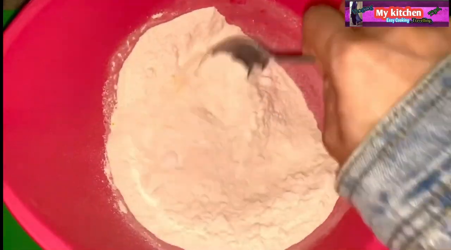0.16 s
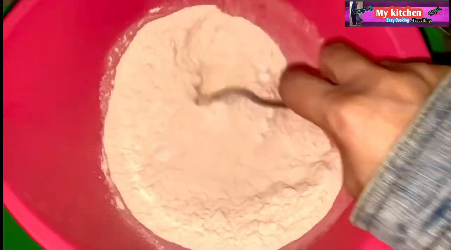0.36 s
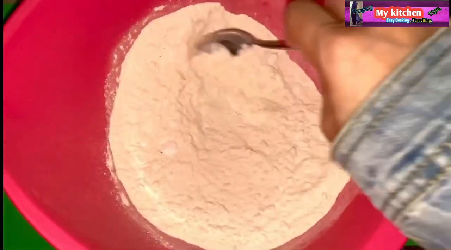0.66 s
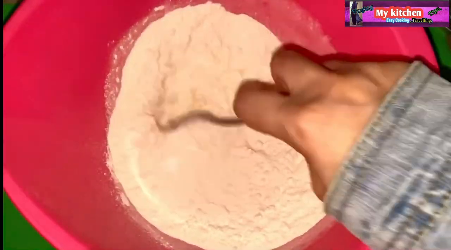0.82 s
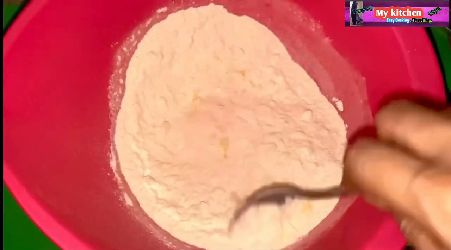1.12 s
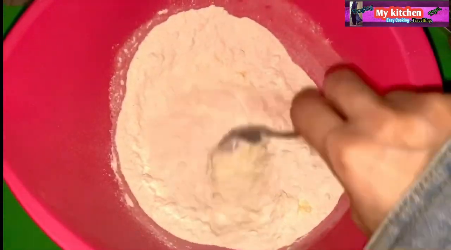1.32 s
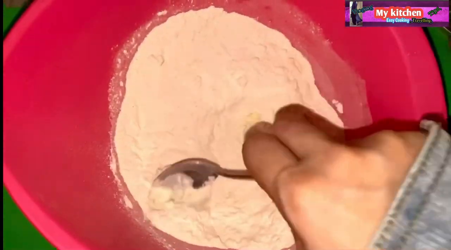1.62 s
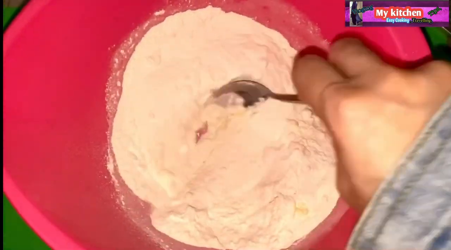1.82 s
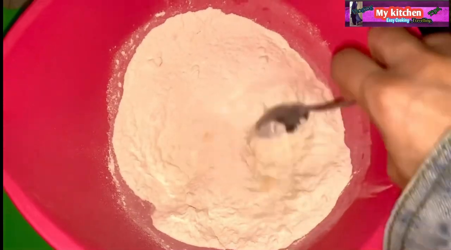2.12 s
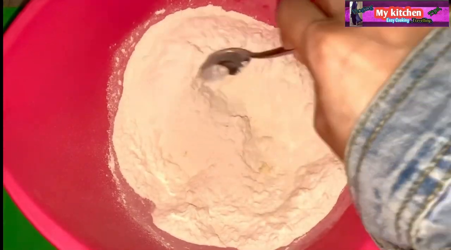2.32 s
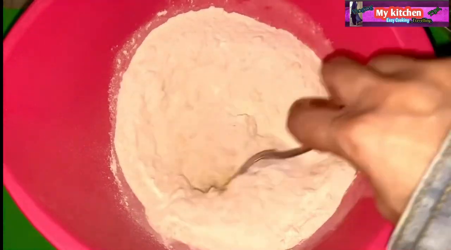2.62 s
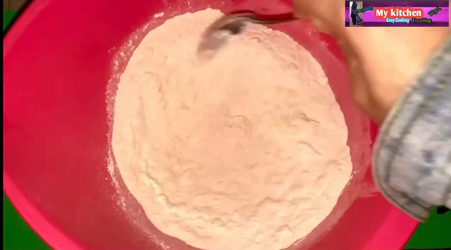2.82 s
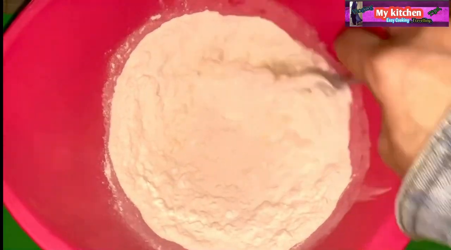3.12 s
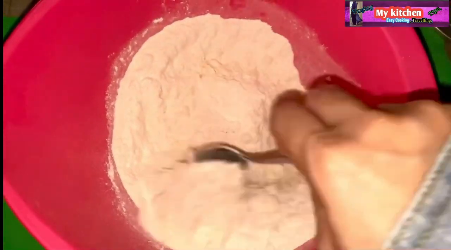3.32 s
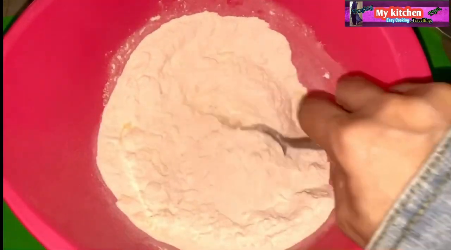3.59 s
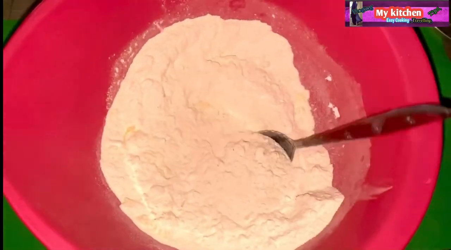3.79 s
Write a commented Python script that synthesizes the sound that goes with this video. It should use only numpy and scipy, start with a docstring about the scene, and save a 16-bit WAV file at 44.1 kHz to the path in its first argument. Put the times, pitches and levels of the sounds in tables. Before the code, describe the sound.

A metal spoon stirs dry flour in a plastic bowl with gritty scrapes and dull knocks

```python
"""A metal spoon stirs dry flour in a plastic bowl, close under a phone in a small kitchen.
From the start a low room rumble, airy room noise and a wavering mains hum run under soft hisses of sliding flour.
Knocks begin at 0.14 s: a blow and one quick bounce ring the parts of the bowl and add a crack of noise.
Scrapes come in bursts from 0.29 s to the end: flour grains grind under the spoon's edge, ring the bowl and hiss.
A short, dull echo follows the sounds of the bowl."""
import sys
import numpy as np
from scipy import signal
from scipy.fft import rfft, irfft
from scipy.io import wavfile
from scipy.ndimage import uniform_filter1d

SR = 44100
rng = np.random.default_rng(int(sys.argv[2]) if len(sys.argv) > 2 else 0)


def log_audio(samples):
    """Write samples as a 16-bit WAV file to the path given in sys.argv[1]."""
    # one column per channel
    frames = np.atleast_2d(samples).T
    # limit to full scale, then quantise
    limited = np.clip(frames, -1, 1)
    pcm = np.round(limited * 32767).astype(np.int16)
    wavfile.write(sys.argv[1], SR, pcm)


N = 174195  # length of the scene [samples]


def undb(db):
    """Turn decibels into a plain amplitude factor."""
    return 10 ** (np.asarray(db) / 20)


def unit(x):
    """Scale a sound to an rms of 1."""
    return x / np.sqrt(np.mean(x ** 2))


def over_hz(table, outside=None):
    """Read a (frequency [Hz], value) table at every frequency bin, along a log scale of pitch."""
    hz, value = np.array(table).T
    bins_hz = np.fft.rfftfreq(N, 1 / SR)
    return np.interp(np.log(bins_hz + 1), np.log(hz + 1), value, outside, outside)


def colour(x, table):
    """Filter a sound by a (frequency [Hz], level [dB]) table, silent outside it."""
    return irfft(rfft(x) * undb(over_hz(table, outside=-200)), N)


def walk(rate):
    """Wander through random levels, `rate` new ones a second, smoothed twice; spread near 1."""
    hold = int(SR / rate)
    steps = np.repeat(rng.standard_normal(N // hold + 1), hold)
    smooth = uniform_filter1d(uniform_filter1d(steps, hold), hold)
    return 1.5 * smooth[:N]


RISE_CYCLES = 0.47  # a mode swells over about this many of its own cycles


def ring(x, modes):
    """Let a force set off decaying tones (modes) of a solid part; white noise keeps its rms."""
    t = np.arange(SR // 2) / SR
    response = np.zeros(len(t))
    for k, (hz, db, t60) in enumerate(modes):
        swell = 1 - np.exp(-(t * hz / RISE_CYCLES) ** 2)
        decay = 1000. ** (-t / t60)  # 60 dB down after t60 seconds
        response += (-1) ** k * undb(db) * np.sin(2 * np.pi * hz * t) * decay * swell
    return signal.fftconvolve(x, response / np.sqrt(np.sum(response ** 2)))[:N]


# grains per second, and how strongly their random size spreads their level [dB]
GRAINS_PER_S, GRAIN_SPREAD_DB = 6000, 1.8
# how often a new strength of catch-and-slip is drawn, and how far it swings the level [dB]
CATCH_PER_S, CATCH_DB = 110, 2.3


def grains():
    """Make dense clicks, one per flour grain of uneven size; the edge catches and slips."""
    hit = rng.random(N) < GRAINS_PER_S / SR
    size = rng.exponential(size=N)
    sign = np.sign(rng.standard_normal(N))
    return unit(hit * sign * undb(GRAIN_SPREAD_DB * size + CATCH_DB * walk(CATCH_PER_S)))


# colour of the low room rumble: (frequency [Hz], relative level [dB per Hz])
RUMBLE = [(15, -50), (25, -35), (49, -9), (75, -8), (145, -5.5), (178, -7), (345, -15.5), (367, -18),
          (484, -15.5), (746, -23.5), (1000, -32), (1300, -34), (2200, -120)]
# colour of the airy room noise: (frequency [Hz], relative level [dB per Hz])
AIR_NOISE = [(530, -26), (900, -17), (1070, -12), (1160, 3), (1730, 5), (2270, -3), (6120, -9.5),
             (8600, -34.5), (11200, -52), (18900, -120)]
# balance of the room noise between the phone's two mic ports: (frequency [Hz], left minus right [dB])
ROOM_BALANCE = [(60, 3.5), (110, 1), (200, 3), (380, 2), (700, -2.5), (1290, -1), (2380, -8.5),
                (4400, -4.5), (8120, -26.5), (15000, 30)]
RUMBLE_DB, AIR_DB = -44.5, -60  # rms level of the two sides averaged [dB]
ALIKE_BELOW_HZ = 375  # the two sides grow alike below this
ROOM_FLICKER_DB = 1.


def room(spectrum, level_db):
    """Noise in gently flickering octaves; its two sides share more of it towards the bass."""
    hz = np.fft.rfftfreq(N, 1 / SR)
    apart = np.clip(hz / ALIKE_BELOW_HZ, .1, 1) ** 1.17
    shape = undb(over_hz(spectrum, outside=-200))
    mid, side = (rfft(rng.standard_normal(N)) * shape for _ in range(2))
    left_right = mid + apart * side * np.array([[1], [-1]])
    left_right = left_right * undb(np.outer([.5, -.5], over_hz(ROOM_BALANCE)))
    out = 0
    for low_hz in 20 * 2 ** np.arange(10):
        octave = irfft(left_right * ((hz >= low_hz) & (hz < 2 * low_hz)), N)
        out = out + octave * undb(ROOM_FLICKER_DB * walk(11.0))
    return out / np.sqrt(np.mean(out.mean(axis=0) ** 2)) * undb(level_db)


# tones of the humming appliance: (multiple of the mains frequency, middle level [dB])
HUM_TONES = [(1, -55), (2, -51), (3, -46.5), (4, -50), (5, -76), (6, -57)]
MAINS_HZ, HUM_WAVER_DB = 50.25, 2.5  # middle pitch; typical swing of each tone's level


def hum():
    """An appliance hums at multiples of the mains; pitch and levels waver."""
    mains_hz = MAINS_HZ * (1 + 0.0091 * walk(3.4))
    turn = 2 * np.pi * np.cumsum(mains_hz) / SR
    return sum(undb(db + HUM_WAVER_DB * walk(4.5)) * np.sin(k * turn + k) for k, db in HUM_TONES)


# colours of grinding flour, coarse to fine: (frequency [Hz], relative level [dB per Hz])
COARSE_GRIT = [(1100, -22), (1500, -9), (2150, -3.5), (2400, -7), (2600, -5), (2760, 0.5), (2950, -5),
               (3620, -9), (4500, -17), (5850, -33), (9900, -120)]
FINE_GRIT = [(2650, -45), (4500, -0.5), (5080, 2.5), (7780, 0.5), (8350, -2.5), (8600, -54), (11200, -48),
             (18900, -120)]
FLOUR_DUST = [(5060, -48), (8600, -38), (9050, -2), (10300, 3), (12200, -1), (13300, -22), (14800, -2),
              (16300, -13)]
# loose flour sliding off the spoon: (time [s], level of its dust hiss [dB])
SLIDES = [(0.0, -93), (0.15, -71.5), (0.31, -72), (0.43, -98), (0.66, -69.5), (0.78, -60), (0.9, -80),
          (1.12, -79), (1.26, -87), (1.73, -66), (1.9, -82), (2.07, -78.5), (2.3, -77), (2.5, -82),
          (2.65, -86), (2.88, -74.5), (3.04, -69.5), (3.19, -89), (3.45, -72.5), (3.54, -84), (3.68, -72),
          (3.95, -71)]
SWISH_FINE_GRIT_DB, SWISH_COARSE_GRIT_DB = 4, 8.5  # above the dust hiss


def swish():
    """Loose flour slides softly: one stream of grains makes dust hiss and two sizes of grit."""
    s, db = np.array(SLIDES).T
    force = grains()
    hiss = unit(colour(force, FLOUR_DUST))
    hiss = hiss + undb(SWISH_FINE_GRIT_DB) * unit(colour(force, FINE_GRIT))
    hiss = hiss + undb(SWISH_COARSE_GRIT_DB) * unit(colour(force, COARSE_GRIT))
    return hiss * undb(np.interp(np.arange(N) / SR, s, db))


# ringing tones of table, bowl and spoon: (frequency [Hz], relative level [dB], time to fall 60 dB [s])
TABLE_THUMP = [(58, 0, .35), (100, -12, .15)]
BOWL_BELLY = [(152, 3, 0.031), (233, 0, 0.038), (304, 1.2, 0.028)]
BOWL_FOOT = [(379, 2.5, 0.02), (429.6, -2.5, 0.043)]
BOWL_WALL = [(551, 1, 0.016), (628, 0.5, 0.024), (710, -2.5, 0.021)]
UPPER_WALL = [(948, 21.8, 0.0086), (1141, 6.3, 0.053), (1234, 14.7, 0.024), (1422, 6.2, 0.042)]
BOWL_RIM = [(1502, -1, 0.024), (1736, 2, 0.017), (1973, 10, 0.0089), (2203, 3.5, 0.0087)]
SPOON_METAL = [(3920, -6, .012), (4300, 0, .012), (5330, -8, .012), (6250, -8, .012), (7250, -5, .012)]
# colour of the noisy crack: (frequency [Hz], relative level [dB per Hz])
CRACK_COLOUR = [(1350, -20), (2300, -5), (2800, -9), (3460, -20.5), (5300, -17.5), (8530, -20.5),
                (12600, -27), (16300, -51)]
# spoon knocks: (time [s], strength before the shared gain [dB], wall pitch ratio, bounce against first blow [dB],
# then levels against the strength [dB]: table thump, belly, foot, wall, upper wall, rim, spoon, crack)
KNOCK_LIST = [(0.139, -51, 1.01, -12.5, -9, 7, -12, -15, -9, -10, -29, -27),
              (0.2487, -15, 1.01, -27, -33, -16, -44, -23, -12, -6, -55, -20),
              (.630, -18.5, .97, -20, -19, -39, -34, -14, -11.5, -32, -28, -11),
              (.767, -31, 1.05, -20, -22, -25, -23, -16, -11, -16, -30, -17),
              (0.779, -20, 1.01, -5, -29, 0.5, -20, -18, -31, -32, -36, -30),
              (1.574, -4.5, .9, -28, -12.5, -3, -42, -5.5, -28.5, -32, -61, -30),
              (3.128, -29.5, 1.01, -19, -0.5, 2, -29, -4, -18, -22, -24, -17),
              (3.392, -41, 1.01, -7, -19, -6, -28, -16, -10, -3.5, -42, -24),
              (3.719, 3, 1.12, -10, -48, -36, -18, -12.5, -10.5, -8.5, -50, -22),
              (3.756, -16, 1.01, -16, -27, -27, -22, -11, -6, -20, -35, -42),
              (3.862, -27.5, 1.01, -17, -6, -20, -15, -22, -29, -35, -10.5, -22)]
KNOCK_GAIN_DB = -7.5  # shared by all knocks
CRACK_T60_S, BOUNCE_AFTER_S = 0.013, 0.0056


def knocks():
    """Each knock, with one quick bounce, rings the bowl and cracks; flour on the wall bends its pitch."""
    out = np.zeros(N + SR)
    crack = unit(colour(rng.standard_normal(N), CRACK_COLOUR))
    fade = 1000. ** (-np.arange(2000) / SR / CRACK_T60_S)
    fade = fade / np.sqrt(np.sum(fade ** 2))
    for s, strength_db, bend, bounce_db, *parts_db, crack_db in KNOCK_LIST:
        at = int(s * SR)
        blow = np.zeros(int(BOUNCE_AFTER_S * SR) + 1)
        blow[[0, -1]] = 1, -undb(bounce_db)
        # the first blow holds as much energy as 10 ms of sound at that level
        blow = blow * undb(strength_db + KNOCK_GAIN_DB) * np.sqrt(SR / 100)
        wall = [(hz * bend, db, t60) for hz, db, t60 in BOWL_WALL]
        parts = (TABLE_THUMP, BOWL_BELLY, BOWL_FOOT, wall, UPPER_WALL, BOWL_RIM, SPOON_METAL)
        sound = sum(undb(db) * ring(blow, part) for db, part in zip(parts_db, parts))
        out[at:at + len(sound)] += sound
        puff = np.convolve(np.abs(blow), fade)
        out[at:at + len(puff)] += undb(crack_db) * puff * crack[at:at + len(puff)]
    return out[:N]


# one list per scrape of the spoon: (time [s], then levels [dB]: coarse grit, bowl belly and foot, wall,
# upper wall, rim, fine grit, dust)
SCRAPE_LIST = [
    [(0.29, -81, -64, -66, -52, -63, -73, -52), (0.305, -57, -41, -48, -50, -50, -58, -62),
     (0.311, -38, -40, -43, -41, -42, -50, -57), (0.342, -32.5, -35.5, -30.5, -29.5, -39, -35, -43.5),
     (0.364, -26.5, -48, -24.5, -31.5, -27, -38, -44), (0.378, -47, -32, -38, -41, -49, -54, -55),
     (0.392, -52, -65, -85, -71, -58, -62, -65), (0.43, -59, -66, -68, -62, -54, -65, -71)],
    [(0.69, -62, -61, -59.5, -57, -39, -56, -74), (0.696, -63, -57, -59, -58, -52, -55, -76),
     (0.702, -64, -63, -58, -47, -41.5, -57, -78), (0.712, -73, -63, -62, -60, -42, -58, -79),
     (0.725, -67, -51, -63, -55, -73, -75, -81)],
    [(0.779, -43, -50, -50, -56, -50, -47, -55), (0.79, -45, -31, -40, -53, -50, -44, -47),
     (0.804, -38.5, -46, -52, -38, -50, -43, -46), (0.826, -36.5, -27, -27, -37.5, -30.5, -34.5, -41.5),
     (0.838, -37, -26, -38, -29, -47, -39.5, -51), (0.852, -48, -69, -60, -53, -43, -53, -58),
     (0.87, -50.5, -63, -76, -62, -53, -55.5, -70)],
    [(1.13, -61, -63, -61, -68, -68, -77, -81), (1.146, -53, -61, -71, -50, -60, -60, -65),
     (1.172, -48.5, -54, -51, -55, -47, -56.5, -64), (1.196, -49.5, -43, -65, -53, -45, -60, -63),
     (1.212, -49, -61, -68, -65, -55, -60, -63), (1.226, -60, -57, -61, -59, -66, -65, -69),
     (1.24, -61, -64, -70, -58, -59, -65, -73)],
    [(1.32, -51, -58, -44.5, -52, -55, -67, -67), (1.328, -61, -39, -56, -62, -59, -72, -72),
     (1.338, -54, -63, -63, -54, -52.5, -62, -65), (1.362, -52, -42, -71, -53, -49, -62, -62),
     (1.368, -64, -63, -58, -58, -64, -66, -68), (1.388, -64, -65, -68, -62, -74, -71, -70),
     (1.4, -64, -44.5, -59, -54, -64, -68, -67)],
    [(1.575, -52, -50, -53, -43, -49, -52, -57), (1.585, -34, -46, -41, -46, -54, -51, -52),
     (1.593, -39, -20.5, -31, -50, -34, -45, -54), (1.601, -36, -31, -53, -51, -54, -47.5, -50),
     (1.627, -35, -35, -53, -49, -55, -44.5, -52), (1.641, -60, -38, -52, -56, -57, -64, -69),
     (1.68, -72, -41.5, -50, -62, -56, -66, -77)],
    [(1.7, -75, -43, -61, -63, -67, -65, -70), (1.728, -44.5, -57, -56, -66, -61, -62, -60),
     (1.744, -45.5, -61, -61, -53, -69, -50.5, -51), (1.76, -45, -57, -37, -51, -63, -53, -58),
     (1.772, -71, -61, -74, -61, -67, -71, -69), (1.78, -69, -70, -54, -68, -70, -71, -72)],
    [(2.42, -64, -41, -61, -71, -63, -74, -68), (2.448, -55, -41, -45, -51, -51, -60, -66),
     (2.478, -42, -35, -32, -40, -48, -45, -48), (2.508, -41, -28.5, -37.5, -31, -37, -41.5, -43.5),
     (2.544, -40.5, -34.5, -37.5, -38, -42, -41.5, -44.5), (2.564, -31.5, -37, -38, -39, -44, -43, -46.5),
     (2.602, -53, -42.5, -67, -70, -51.5, -59, -63), (2.63, -56, -57, -65, -69, -56, -60.5, -70.5)],
    [(3.05, -66, -45, -70, -76, -66, -68, -66), (3.086, -54.5, -64, -70, -61, -73, -59, -61),
     (3.104, -46.5, -59, -74, -64, -59, -47, -57), (3.126, -49, -50, -48.5, -49, -60, -54, -56),
     (3.138, -54, -38, -54, -61, -57, -57, -65), (3.15, -48.5, -49.5, -57, -57, -74, -47.5, -55.5),
     (3.2, -60.5, -42, -58, -71, -64, -66, -71)],
    [(3.5, -75, -51, -57, -75, -77, -71, -75), (3.52, -35.5, -40, -43, -45, -44, -41, -54.5),
     (3.548, -36, -39, -33.5, -39.5, -32, -43.5, -48), (3.555, -25.5, -47, -33, -36, -23, -44, -50),
     (3.566, -28, -50, -28, -26.5, -21.5, -45, -54), (3.586, -34, -69, -36.5, -43, -33.5, -56, -59),
     (3.602, -55, -56, -58, -65, -49, -62, -64), (3.62, -57, -46, -46, -52, -65, -68, -76)],
    [(3.732, -44, -14, -20, -29, -36, -47, -69.5), (3.738, -44, -38, -37, -27, -53, -48, -54),
     (3.746, -48, -30.5, -36, -36, -35, -49, -61), (3.76, -37.5, -27.5, -41, -24.5, -28.5, -52, -64),
     (3.778, -52, -41, -37.5, -39, -40.5, -53, -62), (3.836, -50.5, -45.5, -40, -40, -38.5, -58, -63),
     (3.852, -55, -44, -45, -44.5, -50, -56, -63)],
]
FADE_S, FADE_DB = 0.084, -12.5  # how long a scrape fades past its last point, and by how much


def scrapes():
    """Grains under the spoon's edge ring each part of the bowl and hiss as grit and dust."""
    t = np.arange(N) / SR
    level = np.zeros((7, N))
    for rows in SCRAPE_LIST:
        s, *parts_db = np.array(rows).T
        s_faded = np.r_[s, s[-1] + FADE_S]
        for k, db in enumerate(parts_db):
            db_faded = np.r_[db, db[-1] + FADE_DB]
            level[k] += undb(np.interp(t, s_faded, db_faded, -200, -200))
    level = uniform_filter1d(level, size=200)  # soften the corners over 200 samples
    parts = (BOWL_BELLY + BOWL_FOOT, BOWL_WALL, UPPER_WALL, BOWL_RIM)
    body = sum(ring(grains() * lv, part) for lv, part in zip(level[1:5], parts))
    colours = (COARSE_GRIT, FINE_GRIT, FLOUR_DUST)
    hiss = sum(lv * unit(colour(grains(), c)) for lv, c in zip(level[[0, 5, 6]], colours))
    return body + hiss


ECHO_T60_S, ECHO_DULL_HZ = .38, 1540  # fall by 60 dB; the echo loses treble above this


def echo(near):
    """The kitchen answers with a dull, fading wash of noise, alike on both sides in the bass."""
    t = np.arange(SR // 2) / SR
    tail = rng.standard_normal((2, len(t))) * 1000. ** (-t / ECHO_T60_S) * (t > .004)
    tail = signal.lfilter(*signal.butter(1, ECHO_DULL_HZ, fs=SR), tail)
    # the right side differs from the left only in what passes this high-pass
    difference = signal.lfilter(*signal.butter(2, ALIKE_BELOW_HZ, "high", fs=SR), tail - tail[0])
    tail = tail[0] + difference
    return signal.fftconvolve(near[None], tail / np.sqrt(np.sum(tail ** 2) / 2), axes=1)[:, :N]


# balance of the near sound between the two mic ports: (frequency [Hz], left minus right [dB])
PORT_BALANCE = [(60, 0), (110, 1), (200, 0.0), (380, 2), (700, -5), (1290, -1.5), (2380, -8.5), (4400, -8),
                (8120, -1.5), (15000, 1.5)]
# timing between the two mic ports: (frequency [Hz], phase by which left leads [radians])
PORT_LEAD = [(0, 0), (300, -.6), (700, -1.6), (950, -1.4), (1200, 1.5), (1810, -1.3), (2840, -1.2),
             (6460, -1.), (8270, -2.6), (9560, -2.2), (10400, -1.), (12100, .6), (12700, 1.8), (16400, 1.6)]


def mic_ports(near):
    """The near sound reaches the phone's two ports with unequal level and phase at each frequency."""
    balance = undb(np.outer([.5, -.5], over_hz(PORT_BALANCE)))
    ports = balance * np.exp(1j * np.outer([1, 0], over_hz(PORT_LEAD)))
    ports = ports / np.maximum(np.abs(ports.mean(axis=0)), .6)  # even out the average, within limits
    return irfft(rfft(near) * ports, N)


WIDE_DB, ECHO_DB = -15, -20.5  # gain of the spread-out grains and of the echo


def scene():
    """Mix the bowl's sounds, their spread and echo over the room and hum."""
    background = room(RUMBLE, RUMBLE_DB) + room(AIR_NOISE, AIR_DB) + hum()
    near = swish() + knocks() + scrapes()
    # grains across the bowl reach the two ports differently: fresh grains, opposite on the two sides
    wide = undb(WIDE_DB) * (swish() + scrapes()) * np.array([[1], [-1]])
    return mic_ports(near) + wide + undb(ECHO_DB) * echo(near) + background


BASS_CUT_HZ, TOP_HZ = 32, 16200


def record(dry):
    """The phone thins the lowest bass, cuts the top and clips at full scale."""
    thin_filter = signal.butter(2, BASS_CUT_HZ, "high", fs=SR, output="sos")
    top_filter = signal.ellip(8, .2, 70, TOP_HZ, fs=SR, output="sos")
    thin = signal.sosfilt(thin_filter, dry)
    return np.clip(signal.sosfilt(top_filter, thin), -1, 1)


dry = scene()
out = record(dry)
log_audio(out)
```